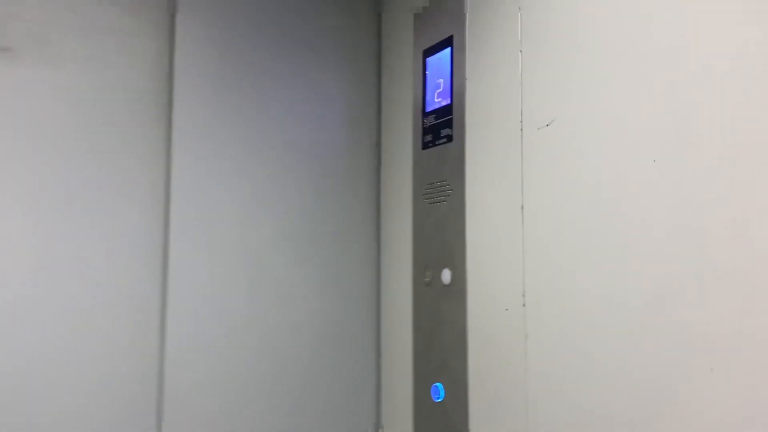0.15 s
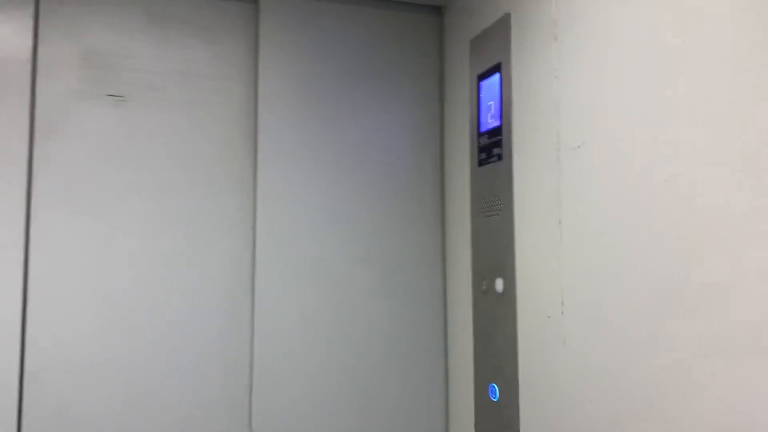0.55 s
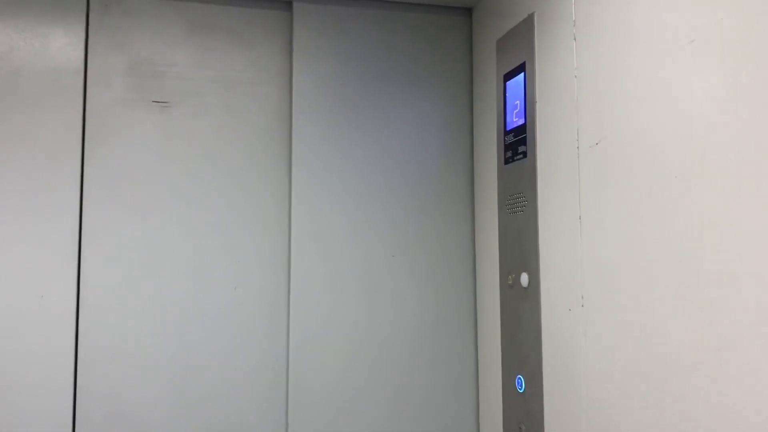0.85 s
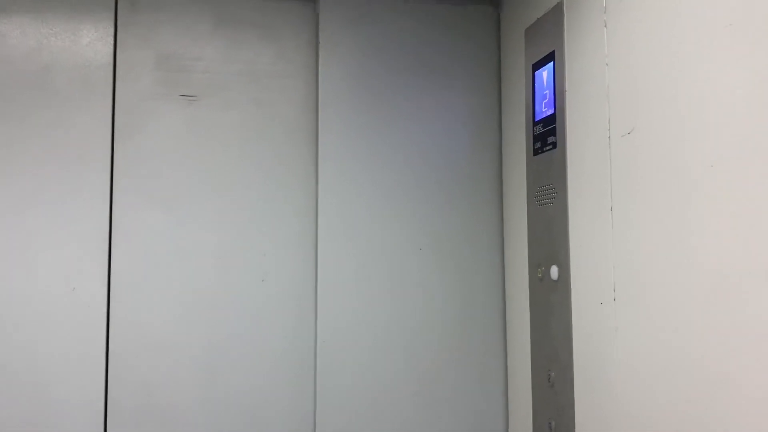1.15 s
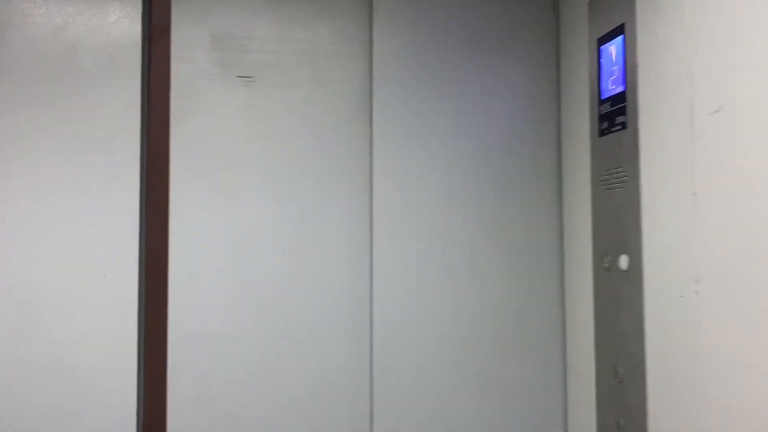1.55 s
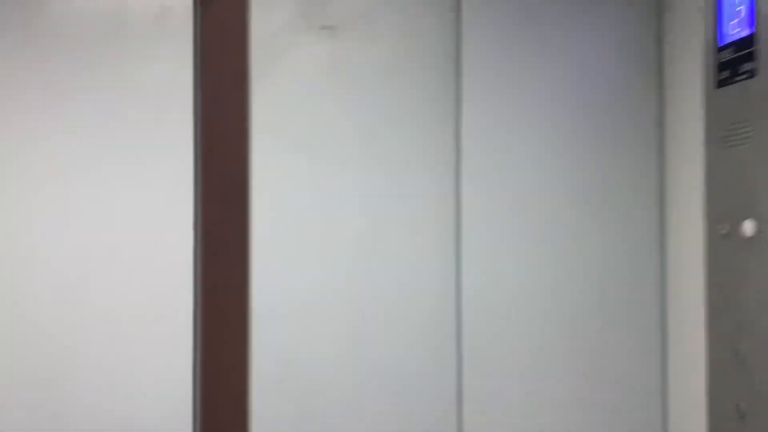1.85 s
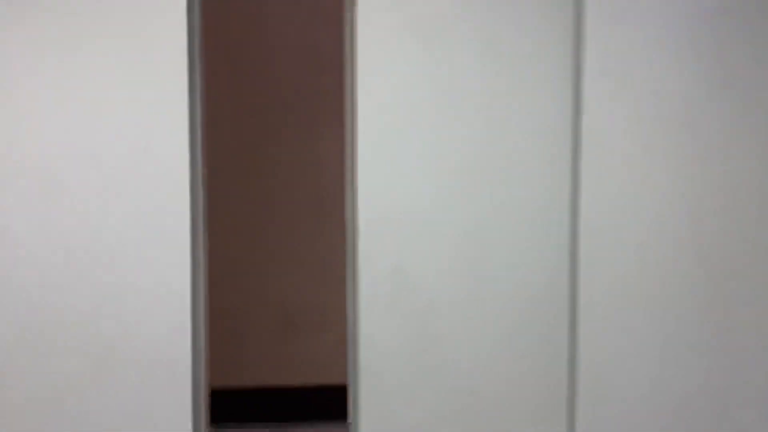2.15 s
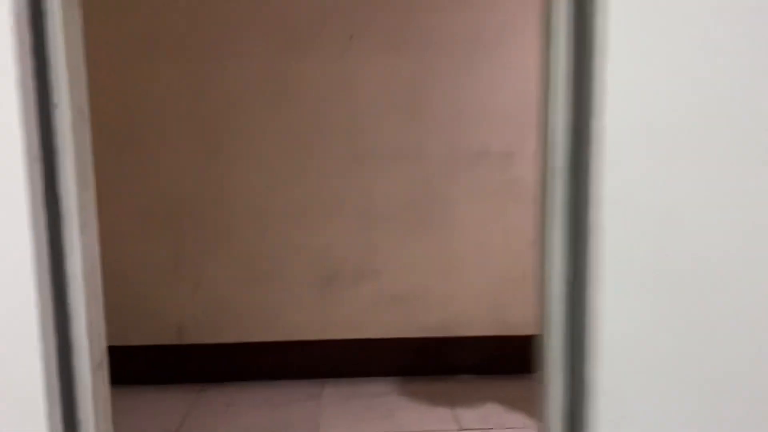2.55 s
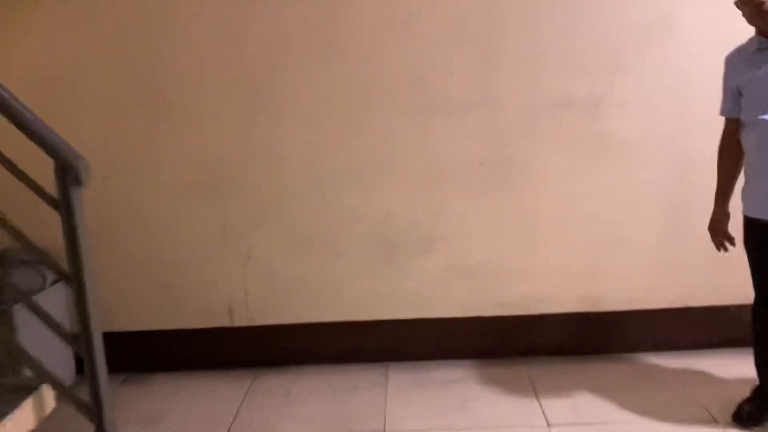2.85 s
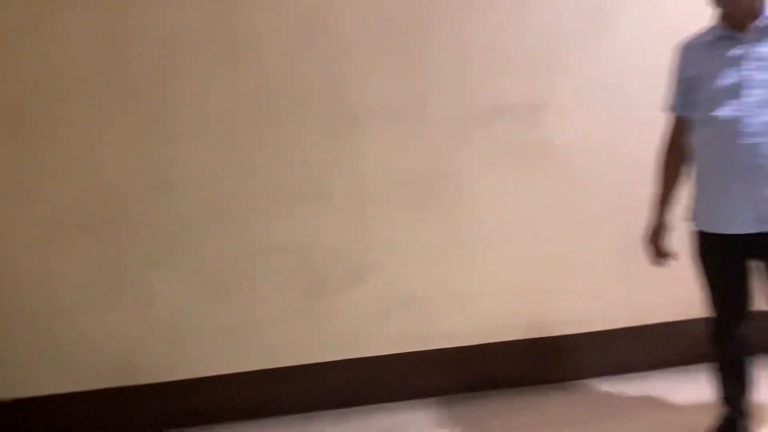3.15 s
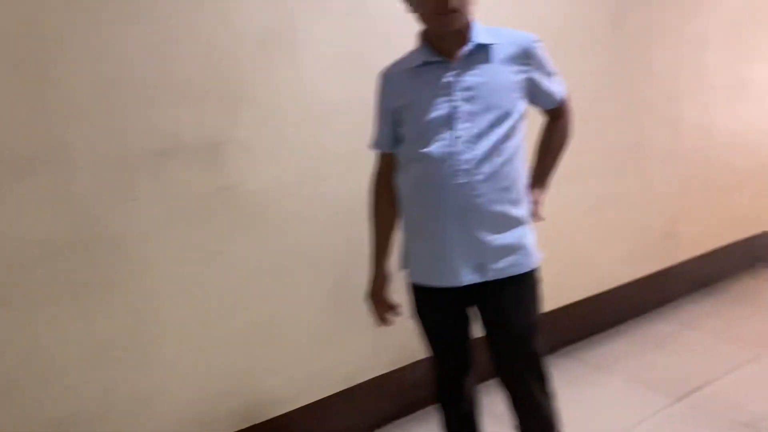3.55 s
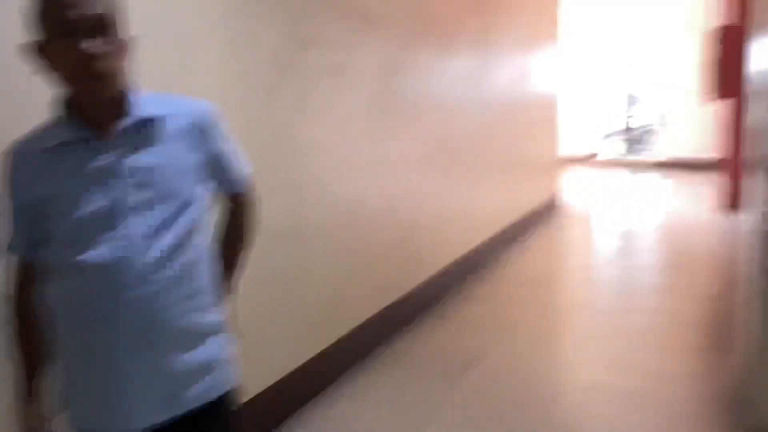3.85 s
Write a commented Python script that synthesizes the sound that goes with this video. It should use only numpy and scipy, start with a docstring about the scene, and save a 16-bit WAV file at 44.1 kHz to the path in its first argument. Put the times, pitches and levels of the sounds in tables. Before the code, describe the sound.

Lift doors slide open with a rolling rumble and motor hum, after a ringing brake clank and a squeaking latch. The microphone starts inside the metal cabin under a steady fan, then moves out through the doorway.

```python
"""Inside a metal lift cabin, a stereo microphone under the steady fan. The brake clamps with a steel clank
that rings through the shaft, and the door catch lets go with a bump and a squeak. The door drive hums
as the panels roll open, their rollers rumbling and knocking along the rail. The microphone moves out
through the doorway, past small clicks and a shoe scuff. There the track is brighter, and the fan's hiss
fades while a low hum swells."""
import sys
import numpy as np
from scipy import signal
from scipy.fft import rfft, irfft
from scipy.io import wavfile
from scipy.ndimage import uniform_filter1d

SR = 44100
rng = np.random.default_rng(int(sys.argv[2]) if len(sys.argv) > 2 else 0)


def output_pcm(signal):
    """Save a mono or channel-first signal as 16-bit PCM at the path in sys.argv[1].

    Samples are clipped to [-1, 1] before scaling.
    """
    pcm = np.clip(np.atleast_2d(signal).T, -1, 1) * 32767
    wavfile.write(sys.argv[1], SR, np.round(pcm).astype(np.int16))


N = 176400
T, HZ = np.arange(N) / SR, np.fft.rfftfreq(N, 1 / SR)


def doors():
    """Rollers shake the sheet-metal panels close by; the guides hiss along the sill."""
    # Rollers from inside the cabin, the track's brighter grind from the doorway, and the guides' hiss.
    # Each row: frequency in Hz, relative level in dB.
    roll_spectrum = [(120, -40), (220, -14), (300, -4.5), (390, -4), (470, 4), (560, 3), (690, -1),
                     (800, -5), (1100, -17.5), (1500, -29), (2500, -46), (5000, -52)]
    track_spectrum = [(150, -32), (280, -9.5), (400, -15), (540, -1.5), (660, 0), (760, -1.5), (860, -0.5),
                      (930, -7), (1200, -6), (1400, -18.5), (2000, -19.5), (2500, -26.5), (3200, -25),
                      (4500, -30), (8000, -48)]
    guide_spectrum = [(2500, 5), (5000, -0.5), (7500, -6), (9000, 2), (10300, 1.5), (12000, 0), (13500, -5),
                      (15500, -14)]
    # The same three on the microphone's way out. Each row: time in seconds, level in dB.
    roll_levels = [(1.3, -60), (1.5, -48), (1.85, -54), (1.955, -38), (1.992, -26.5), (2.15, -22),
                   (2.36, -21.5), (2.55, -22.5), (2.75, -21.5), (3.05, -25), (3.55, -23.5), (3.72, -26),
                   (3.85, -34), (4, -32.5)]
    track_levels = [(1.8, -54), (2.3, -30.5), (2.66, -31.5), (2.82, -22), (3.05, -22.5), (3.22, -22.5),
                    (3.45, -27), (3.7, -32), (3.85, -32), (4, -33)]
    guide_levels = [(1.75, -62), (2.02, -47.5), (2.45, -51), (2.6, -66), (2.8, -53), (3.1, -56),
                    (3.35, -44.5), (3.6, -66), (3.75, -53), (4, -52)]
    # Panel resonances. Each row: frequency and width in Hz, gain in dB from the cabin, from the track.
    panel_modes = [(377.8, 9.1, -11.5, -18), (422, 12.2, -13, -9.5), (459.6, 4.7, -14, -30),
                   (499.6, 4.8, -12.5, -34), (667.5, 20, -18.5, -6), (1014, 12, -35, -11.5),
                   (1263, 10, -35, -17), (1457, 39, -42, -17)]
    inside, doorway = level(roll_levels), level(track_levels)
    rolling = inside * colour(roller_bumps(), roll_spectrum)
    rolling += doorway * colour(roller_bumps(), track_spectrum)
    shake = rfft(roller_bumps())
    for hz, width, inside_db, track_db in panel_modes:
        rolling += resonance(shake, hz, width) * (inside * amp(inside_db) + doorway * amp(track_db))
    hiss = level(guide_levels) * colour(noise(), guide_spectrum)
    flicker_db = 2.5 * np.tanh(drift(25))
    return rolling + hiss * amp(flicker_db)


def roller_bumps(per_second=1100, spread_db=2):
    """Tiny jolts of a wheel on a rough rail, with their reflections, over a smooth rush."""
    jolts = rng.standard_normal(N) * amp(spread_db * np.minimum(rng.exponential(1, N), 4))
    jolts *= rng.random(N) < per_second / SR
    return unit(unit(cabin(jolts)) + 0.81 * noise())


def rollers(width_hz=48):
    """The rollers whirr at a wandering pitch and knock over rough spots in the rail."""
    # The rollers' resonance. Each row: time in seconds, pitch in Hz, level in dB.
    whirr_path = [(1.951, 430, -48), (2.02, 480, -34), (2.1, 555, -28.5), (2.17, 625, -25),
                  (2.27, 590, -26), (2.36, 655, -25), (2.43, 545, -27), (2.551, 490, -23), (2.66, 470, -31),
                  (2.78, 560, -25), (2.88, 615, -23.5), (3.0, 670, -27.5), (3.1, 590, -30),
                  (3.23, 640, -25), (3.38, 660, -30), (3.6, 570, -33), (3.9, 520, -53)]
    # Knocks on the rail. Each row: start in seconds, level in dB.
    rough_spots = [(2.148, -21), (2.191, -22), (2.332, -20), (2.357, -19), (2.44, -17.5), (2.505, -16.5),
                   (2.535, -16), (2.578, -19), (2.648, -19), (2.765, -15)]
    times, hz, whirr_db = np.transpose(whirr_path)
    carrier = np.exp(2j * np.pi * np.cumsum(np.interp(T, times, hz)) / SR)
    shudder = np.array([drift(width_hz) + 1j * drift(width_hz) for side in range(2)])
    whirr = unit(pair((carrier * shudder).real)) * amp(np.interp(T, times, whirr_db))
    knocks = sum(burst(start, db, hz=496, octaves=.36, rise=.0032, t60=.07) for start, db in rough_spots)
    return whirr + knocks


def brake(touch_s=.2, clamp_s=.2555, shaft_s=.26, rise_s=.014, blow_t60=.69):
    """A light touch, then a chattering steel clank with ringing modes; the shaft swells up behind it."""
    # The blow and the shaft's answer. Each row: frequency in Hz, relative level in dB.
    blow_spectrum = [(800, -27), (1700, -7), (2300, -8.5), (2600, 5), (3100, -3.5), (3700, -7.5),
                     (5000, -20), (8000, -40)]
    shaft_spectrum = [(100, -8), (220, -11.5), (370, 2.5), (700, -7.5), (1200, -2), (1900, -8), (3000, 3),
                      (4000, -10), (5200, -11), (6500, -22.5), (9000, -27.5), (11000, -35), (13000, -32),
                      (16000, -52)]
    # The brake shoe chatters as it bites. Each row: start in seconds, level in dB.
    bites = [(.272, -24), (.318, -28), (.333, -20.5), (.366, -25)]
    # Ring of the steel. Each row: frequency in Hz, level in dB, 60 dB decay time in seconds.
    steel_modes = [(2229, -34, .6), (2482, -38, 2.4), (2519, -27.5, .7), (2563, -24, .85), (2665, -31, .7),
                   (2698, -33, .6), (2751, -30.5, .8), (2846, -33, .8), (2973, -27, .7), (3038, -32, .75),
                   (3068, -30.5, .75), (3120, -32, .7), (3252, -36, .55), (3369, -34, .55), (3596, -37, .5),
                   (4807, -41, .5)]
    # Reverberation of the shaft. Each row: frequency in Hz, 60 dB decay time in seconds.
    shaft_decay = [(300, 1.35), (1200, 1.38), (3000, 0.67), (5000, 0.91), (11000, 0.32)]
    touch = amp(-38) * swell(touch_s, rise=clamp_s - touch_s, hold=clamp_s - touch_s, t60=blow_t60)
    chatter = sum(amp(db) * swell(start, rise=.002, hold=.002, t60=.082) for start, db in bites)
    clamp = amp(-25) * swell(clamp_s, rise_s, hold=.02, t60=blow_t60)
    blow = colour(standing_waves(noise()), blow_spectrum) * (touch + chatter + clamp)
    ring = 0
    for hz, db, t60 in steel_modes:
        cycles = hz * T + rng.random() + 0.74 * rng.random((2, 1))  # each side has its own phase
        ring += amp(db) * np.sqrt(2) * np.sin(2 * np.pi * cycles) * swell(clamp_s, rise_s, 0, t60)
    shaft = colour(standing_waves(noise()), shaft_spectrum)
    shaft = die_away(shaft, shaft_s + .11, shaft_decay) * ramp(T - shaft_s, .045)
    return blow + ring + amp(-21) * shaft


def door_drive():
    """The drive sets cabin and panels droning at one pitch after another, over a low rumble."""
    # Drones. Each row: start and end in seconds, pitch in Hz, level in dB, fade in seconds.
    notes = [(1.287, 1.433, 92.3, -29, 0.042), (1.352, 1.55, 382, -37, 0.04),
             (1.415, 2.415, 36, -36, 0.177), (1.498, 2.083, 57.14, -36.5, 0.1),
             (1.65, 1.946, 150.9, -41.5, 0.094), (1.962, 2.24, 385.3, -28, 0.04),
             (2.246, 2.46, 457, -23.5, 0.057), (2.473, 2.718, 419.8, -24, 0.07),
             (2.53, 2.91, 84.4, -27, 0.07), (2.697, 2.92, 57, -31.5, 0.086),
             (2.989, 3.189, 379.5, -23.5, 0.058), (3.05, 3.352, 1258, -33.5, .1),
             (3.2, 3.55, 424.2, -28, .12), (3.854, 4.104, 71.4, -38, 0.089)]
    # Rumble of the moving doors. Each row: frequency in Hz, relative level in dB.
    rumble_spectrum = [(25, -32), (50, -19.5), (76, 4), (105, -7.5), (140, -6), (200, -9.5), (300, -4),
                       (600, -15.5), (1200, -15), (3000, -40)]
    # Its rise and fall. Each row: time in seconds, level in dB.
    rumble_levels = [(1.2, -67), (1.55, -38.5), (2.1, -32), (2.6, -36.5), (3, -28), (3.4, -27), (4, -30)]
    drones = 0
    for start, end, hz, db, fade in notes:
        envelope = ramp(np.minimum(T - start, end - T), fade)
        drones += amp(db) * tone(hz, waver=.00898, flutter=.29) * envelope
    return drones + level(rumble_levels) * colour(noise(), rumble_spectrum)


def door_catch(jitter=.028):
    """The catch bumps the panels, slips with a rough squeak and a rasp, and drops free with a thud."""
    # The squeak's glide. Each row: time in seconds, pitch in Hz.
    glide = [(1.326, 2030), (1.35, 2165), (1.38, 2205), (1.41, 2255), (1.49, 2265)]
    # Its partials. Each row: multiple of the pitch, relative level in dB.
    partials = [(1, -39), (2, -42), (3, -54)]
    # Rasp of the catch and its bump in the panels. Each row: frequency in Hz, relative level in dB.
    rasp_spectrum = [(1500, -5), (2050, 4), (2550, 5), (3000, -12), (3800, -1), (4500, -5), (5100, 0),
                     (5700, -4), (7800, -6), (9100, 5.5), (10400, -1.5), (12000, -4), (13500, -10),
                     (15000, -24)]
    bump_spectrum = [(50, -15), (92, -5), (125, -8), (180, 0), (260, -4.5), (380, -4), (550, -9),
                     (1000, -18), (2500, -25.5)]
    # Resonances of the catch. Each row: frequency in Hz, width in Hz, level in dB.
    catch_modes = [(2226, 45, -44), (2490, 64, -43.5), (2630, 97, -43), (4520, 110, -50), (5660, 140, -50),
                   (6870, 120, -48.5), (7760, 230, -47.5), (8150, 160, -47), (10330, 160, -47.5)]
    # The thud: start in seconds, level in dB, centre in Hz, width in octaves, rise and decay in seconds.
    thud = (1.46, -29, 150, .8, .008, 0.26)
    times, pitch = np.transpose(glide)
    cycles = np.cumsum(np.interp(T, times, pitch) * (1 + jitter * drift(192))) / SR
    rub = ramp(T - times[0], .016) * ramp(times[-1] - T, .07)
    squeak = rub * sum(amp(db) * unit(np.sin(2 * np.pi * k * cycles)) for k, db in partials)
    friction = standing_waves(noise())
    slips = rfft(friction)
    rasp = amp(-36.5) * colour(friction, rasp_spectrum)
    rasp += sum(amp(db) * resonance(slips, hz, width) for hz, width, db in catch_modes)
    rasp *= swell(1.352, rise=.023, hold=.055, t60=.54)
    bump = amp(-33) * colour(noise(), bump_spectrum) * swell(1.167, rise=.15, hold=.32, t60=1.1)
    return bump + amp(-2) * squeak + amp(-4) * cabin(squeak) + rasp + burst(*thud)


def clicks():
    """Door fittings click and a shoe scuffs on the way through the doorway."""
    # Each row: start in seconds, level in dB, centre in Hz, width in octaves, rise and decay in seconds.
    contacts = [(2.434, -46, 13000, .17, .001, .06), (2.817, -32, 3600, 0.8, 0.003, 0.19),
                (2.84, -26, 1100, .7, .004, .14), (2.95, -39, 8700, 0.45, 0.0021, 0.11),
                (3.12, -35, 2780, 0.65, 0.045, 0.36), (3.22, -45, 8500, 0.33, .002, .1),
                (3.228, -23.5, 1050, .45, 0.0033, 0.11), (3.678, -45, 10100, 0.35, .003, 0.11),
                (3.87, -36.5, 1800, 0.95, 0.034, .4)]
    return sum(burst(*contact) for contact in contacts)


def fan():
    """Air hiss and hum of the cabin fan; on the way out the hiss fades while the hum swells."""
    # Moving air, then the tones of the hum. Each row: frequency in Hz, relative level in dB.
    air_spectrum = [(15, -42), (25, -6.5), (64, 3.5), (90, 0), (120, -9.5), (144, -5), (180, -14.5),
                    (380, -13), (614, -13.5), (1800, -24), (2550, -25), (3400, -30.5), (4900, -36.5),
                    (7100, -29.5), (8800, -35.5), (11500, -40), (13500, -49), (15500, -51)]
    hum_tones = [(58, -46.5), (86, -49), (145, -47.5), (377, -52), (1023, -59.5)]
    # Air and hum at the microphone. Each row: time in seconds, gain in dB.
    air_levels = [(0, -34.5), (1, -34), (2.4, -32.5), (2.8, -35.5), (4, -38)]
    hum_levels = [(0, -4), (1.8, 2.5), (2.3, -13.5), (4, 7.5)]
    hum = sum(amp(db) * tone(hz, waver=.0116, flutter=.31) for hz, db in hum_tones)
    air = colour(standing_waves(noise()), air_spectrum)
    return air * level(air_levels) + hum * level(hum_levels)


def cabin(x):
    """Dense reflections between the close metal walls."""
    # Each row: frequency in Hz, 60 dB decay time in seconds.
    wall_decay = [(100, 0.96), (500, 0.2), (2500, 0.75), (10000, 0.15)]
    tail = die_away(rng.standard_normal((2, SR // 2)), 0, wall_decay)
    tail /= np.linalg.norm(tail[0])
    return pair(signal.fftconvolve(x[None], tail, axes=1)[:, :N])


def standing_waves(x, depth_db=3, spacing_hz=12.3):
    """Standing waves in shaft and cabin lift and sink narrow bands at random."""
    bins = round(spacing_hz * N / SR)
    ripple = unit(uniform_filter1d(uniform_filter1d(rng.standard_normal(len(HZ)), bins), bins))
    return unit(irfft(rfft(x) * amp(depth_db * np.clip(ripple, -2, 2)), N))


def pair(x):
    """Makes two unrelated channels partly alike, as at the two microphone ports."""
    # Each row: frequency in Hz, left-right likeness from 0 to 1.
    port_likeness = [(50, .55), (130, .45), (350, .62), (700, .4), (1300, .08), (2600, .15), (4500, .35),
                     (6000, .4), (7200, .92), (15000, .9)]
    a, b = rfft(x)
    likeness = read(port_likeness, HZ)
    mid, side = a * np.sqrt((1 + likeness) / 2), b * np.sqrt((1 - likeness) / 2)
    return irfft(np.array([mid + side, mid - side]), N)


def noise():
    """White noise at both microphone ports."""
    return pair(rng.standard_normal((2, N)))


def burst(start, db, hz, octaves, rise, t60):
    """One knock or click: a band of noise that rises and dies away."""
    band = np.exp(-.5 * (np.log2((HZ + 1) / hz) / octaves) ** 2)
    return amp(db) * unit(irfft(rfft(noise()) * band, N)) * swell(start, rise, rise, t60)


def resonance(spectrum, hz, width):
    """Sound of one resonance driven by the given spectrum; rms 1."""
    return unit(irfft(spectrum / (1 + 1j * (HZ - hz) / width) ** 2, N))


def tone(hz, waver, flutter, rate_hz=6):
    """A sine whose pitch wavers and whose level flutters; rms 1."""
    cycles = np.cumsum(hz * (1 + waver * drift(rate_hz))) / SR
    return unit(np.sin(2 * np.pi * cycles) * (1 + flutter * drift(rate_hz)))


def colour(x, spectrum):
    """Gives a signal a spectrum that falls off beyond its ends; rms 1."""
    low_hz, high_hz = .5 * spectrum[0][0], 2 * spectrum[-1][0]
    skirts = 1 / (1 + (HZ / high_hz) ** 2) / (1 + (low_hz / (HZ + 1)) ** 4)
    return unit(irfft(rfft(x) * amp(read(spectrum, HZ)) * skirts, N))


def die_away(x, start, t60s):
    """From start on, each band decays at its own speed."""
    hz, t, bands = signal.stft(x, SR, nperseg=256)
    decay = amp(-60 * np.maximum(t - start, 0) / read(t60s, hz)[:, None])
    return signal.istft(bands * decay, SR, nperseg=256)[1][:, :x.shape[1]]


def swell(start, rise, hold, t60):
    """Envelope that rises, holds until start + hold, then falls 60 dB every t60 seconds."""
    return ramp(T - start, rise) * amp(-60 * np.maximum(T - start - hold, 0) / t60)


def ramp(t, seconds):
    """Straight fade from 0 to 1 over the given seconds."""
    return np.clip(t / seconds, 0, 1)


def drift(rate_hz):
    """Slow random wander of rms 1."""
    return unit(irfft(rfft(rng.standard_normal(N)) * np.exp(-(HZ / rate_hz) ** 2), N))


def level(points):
    """Gain over time from points in seconds and dB."""
    return amp(np.interp(T, *np.transpose(points)))


def read(points, hz):
    """Reads a table on a log-frequency axis."""
    points_hz, values = np.transpose(points)
    return np.interp(np.log(hz + 1), np.log(points_hz + 1), values)


def amp(db):
    """Decibels to gain."""
    return 10 ** (np.asarray(db) / 20)


def unit(x):
    """Scales to rms 1."""
    return x / np.sqrt(np.mean(x ** 2) + 1e-20)


def scene():
    """All sources, leaning to the left, at the two microphone ports."""
    # Balance. Each row: frequency in Hz, left minus right in dB.
    lean = [(40, -4.5), (70, 2), (130, 6), (250, 8.5), (420, 8.5), (600, 3.5), (1200, 4), (4000, 3.5),
            (7000, 3), (10000, -1.5)]
    # Phase between the ports. Each row: frequency in Hz, lead of the left in radians.
    port_phase = [(20, 0), (4500, 0), (6000, .9), (7200, 0), (9050, -3.1), (11200, -6.3), (13100, -9.4),
                  (15000, -12.6)]
    mix = fan() + brake() + door_catch() + door_drive() + doors() + rollers() + clicks()
    half_each = np.array([[.5], [-.5]])
    ports = amp(read(lean, HZ) * half_each) * np.exp(1j * read(port_phase, HZ) * half_each)
    return irfft(rfft(mix) * ports, N)


def record(dry):
    """The recorder cuts the highest treble."""
    lowpass = signal.firwin(511, cutoff=15900, window=("kaiser", 9), fs=SR)
    return signal.oaconvolve(dry, lowpass[None], "same")


dry = scene()
out = record(dry)
output_pcm(out)
```